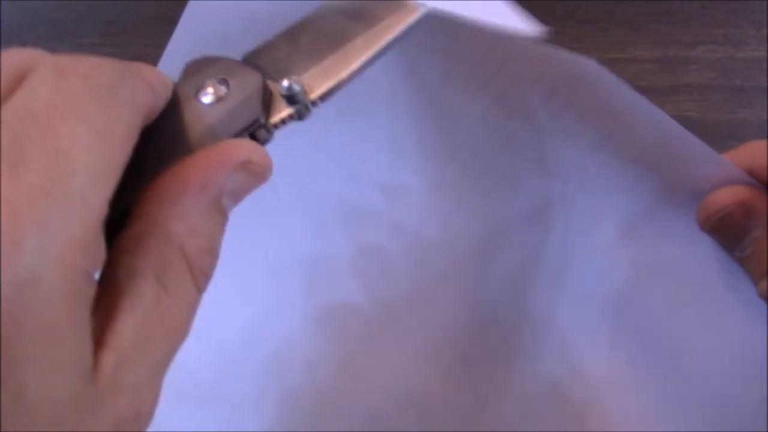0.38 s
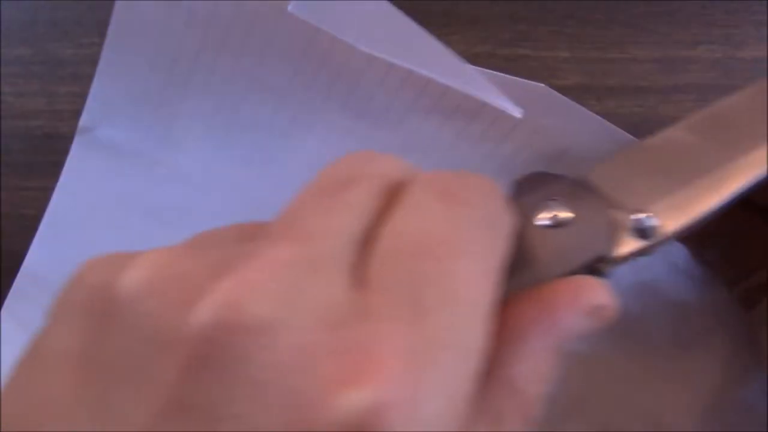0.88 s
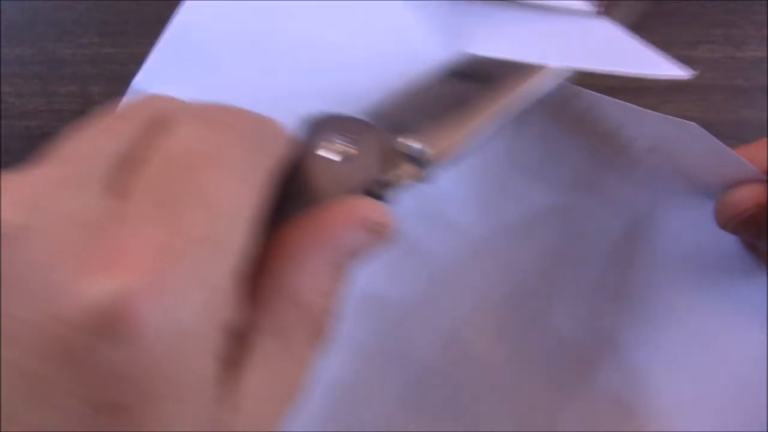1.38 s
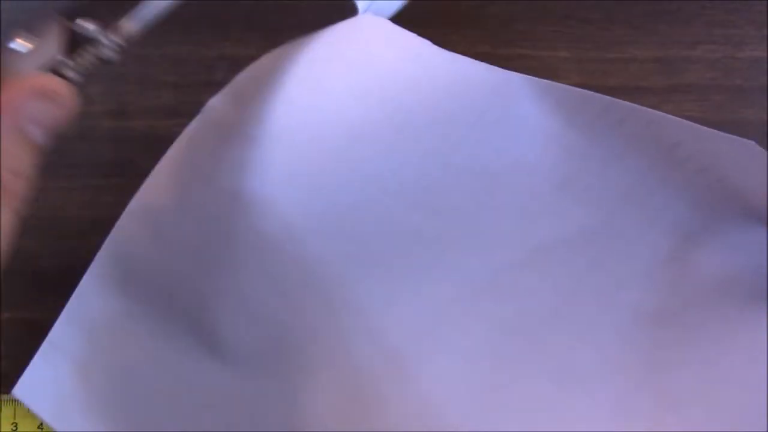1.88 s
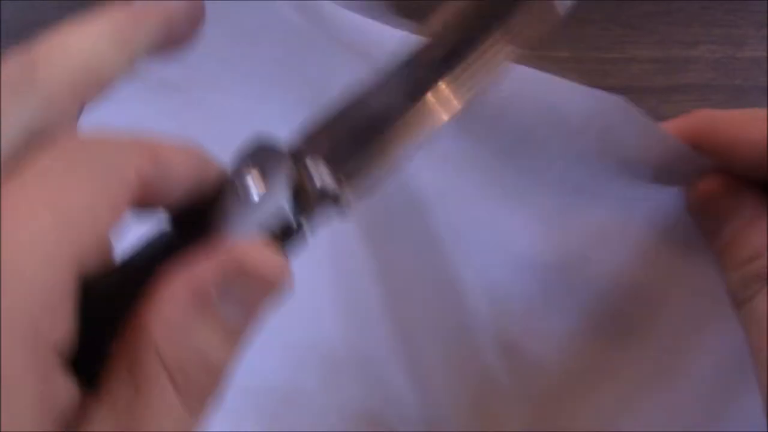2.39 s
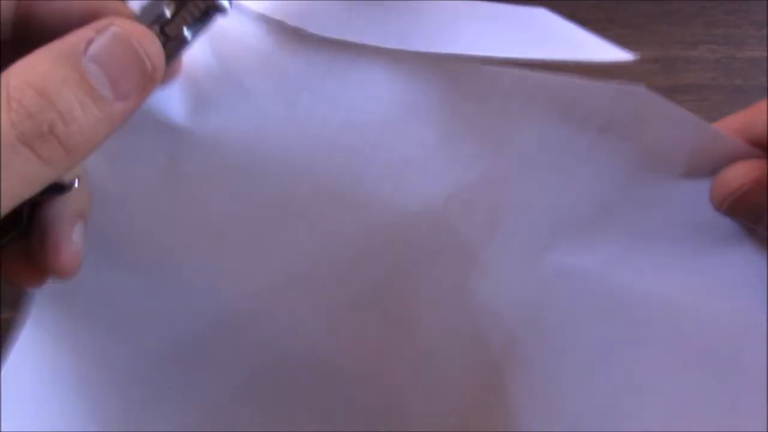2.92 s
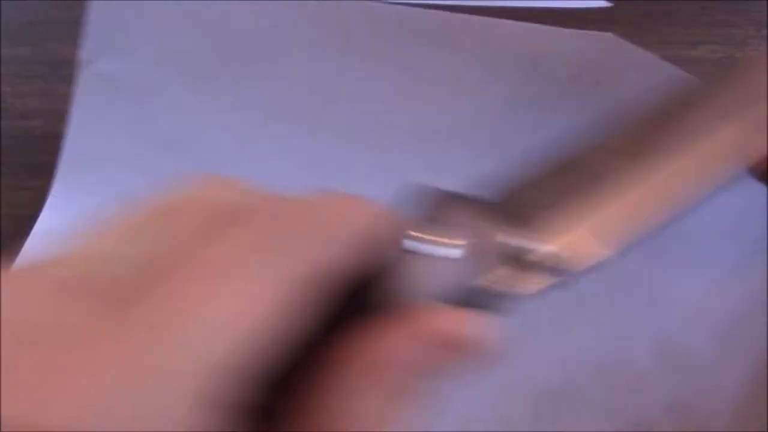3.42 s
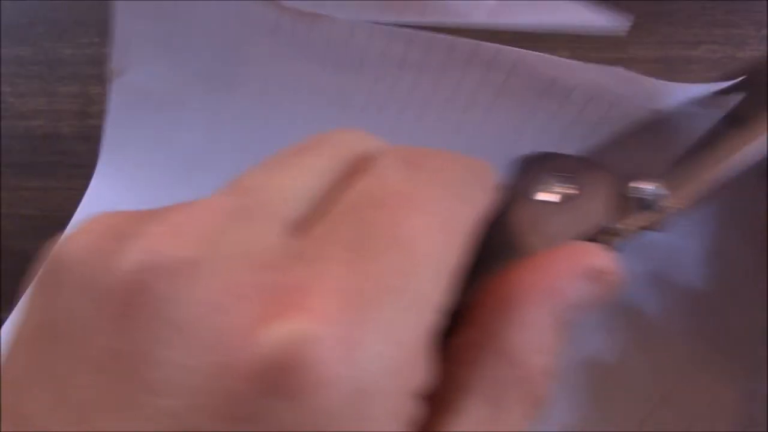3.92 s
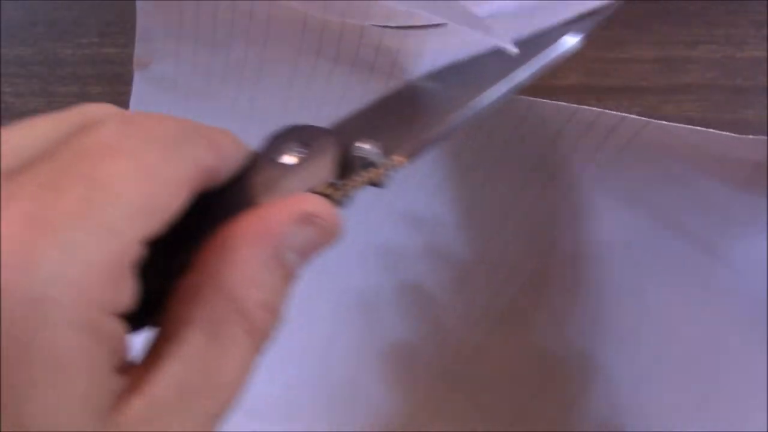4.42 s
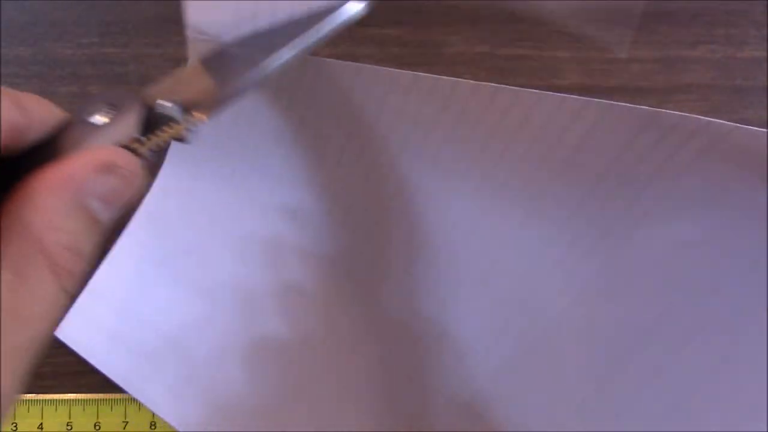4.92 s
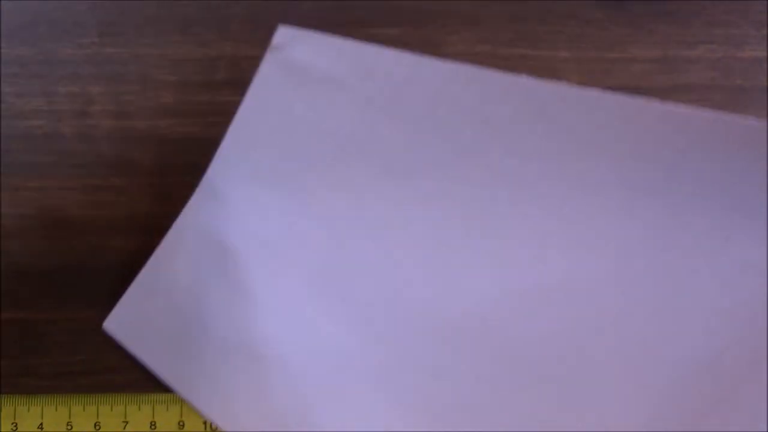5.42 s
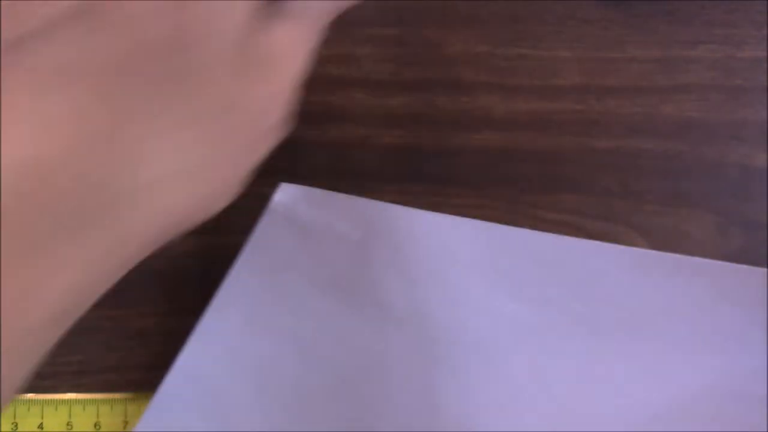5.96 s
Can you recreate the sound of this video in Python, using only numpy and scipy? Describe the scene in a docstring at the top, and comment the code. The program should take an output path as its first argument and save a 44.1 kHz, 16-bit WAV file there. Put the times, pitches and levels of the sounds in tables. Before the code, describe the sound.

Close, dry paper handling in a quiet room: creases snap, a keen knife rips through the sheet, busy crackling follows, then a second longer cut.

```python
"""A hand-held sheet of paper rustles and its creases snap; then a sharp knife slices it in two strokes, more handling
following each. Parting fibres are random impulses that drive the sheet's resonances, which shift as the strip curls away.
Rustle is coloured impulse noise and hiss with scuffed envelopes; each snap is a click with a dying crackle, ringing the sheet.
A small quiet room answers with a decaying noise tail, and faint steady air and microphone hiss lie beneath."""
import sys
import numpy as np
from scipy import signal
from scipy.fft import rfft, irfft, next_fast_len
from scipy.io import wavfile
from scipy.ndimage import uniform_filter1d, map_coordinates

SR = 44100
rng = np.random.default_rng(int(sys.argv[2]) if len(sys.argv) > 2 else 0)


def ratio(d):
    """dB to gain"""
    e = np.asarray(d, float) / 20
    return 10 ** e


def log_audio(samples):
    """Write samples as a 16-bit WAV file to the path given in sys.argv[1]."""
    # one column per channel
    frames = np.atleast_2d(samples).T
    # limit to full scale, then quantise
    limited = np.clip(frames, -1, 1)
    pcm = np.round(limited * 32767).astype(np.int16)
    wavfile.write(sys.argv[1], SR, pcm)


N = 267598  # samples

# One list per knife stroke, before a common trim: (t/s, blade pressure level/dB, slack of the strip/dB, brightness/dB,
# curl/dB, whistle/dB, edge resonance f/Hz, top resonance f/Hz)
BLADE_STROKES = [
    [(0.972, -51, 16.5, -10, 1.5, -12, 3450.0, 8000), (0.982, -32.5, 5, -8, -2.5, -12, 3330.0, 8050.0),
     (1.03, -21, -2, -2.5, 2.5, -0.6, 3240.0, 7900), (1.12, -16, 5, -3.5, 1, -3.5, 3380.0, 8700),
     (1.18, -14.5, -4, 1.5, 4, -0.5, 3510.0, 8370), (1.26, -15.5, -1, 6, 2.1, 1.5, 3330.0, 8780),
     (1.36, -12.5, -5, 4.5, -0.5, 3, 3010.0, 8330.0), (1.44, -11.5, -3, 2.2, -3.5, -10.5, 3090.0, 8090.0),
     (1.52, -12.5, 5.5, 0.7, -5.5, -11.5, 3250.0, 7100), (1.62, -11, 1, -0.5, 0.5, -6, 3270.0, 7900),
     (1.67, -19, 6, -2.5, -3.5, -6.8, 3520.0, 8390.0), (1.685, -10.5, -0.6, 6.5, 4, -11, 3600.0, 8140.0),
     (1.702, -18.5, 5, 6, 0, -7.5, 3680, 8210), (1.718, -15.5, 0.5, 4, 5.7, -6, 3600.0, 8230),
     (1.74, -28.5, 17, -3.8, 3, -0.5, 3650.0, 7570.0), (1.8, -31, 10, 0.5, 0, -3, 3440.0, 8060.0),
     (1.87, -50, 9, 7, 10.5, -5, 3520.0, 8390.0)],
    [(3.684, -54, 13, 1.5, -2.6, -4.5, 3090.0, 7850), (3.694, -26, 8.5, -7.5, -3.5, 1, 3000.0, 7730.0),
     (3.735, -31, 13, -1, -1, 3, 3180.0, 8010.0), (3.78, -24, -3, 5, 1.5, 2, 3450.0, 7730.0),
     (3.88, -14, -9.5, 0.5, 8, -1.5, 3550.0, 7560), (3.97, -13, -11, 0, 4.5, -3, 3720.0, 8230.0),
     (4.06, -15.5, -3, 1.5, -0.5, -11, 3540.0, 7990.0), (4.16, -17, -3.5, 1.2, -3.3, 0, 3560.0, 8580.0),
     (4.26, -14.5, 2.7, -6, -4, -2, 3440.0, 7700), (4.36, -13.5, -0.5, -0.5, 3.5, -6, 3520.0, 8020),
     (4.45, -12, 0, -5, 0.3, -4, 3240.0, 8460), (4.55, -14.1, 4.5, -2.5, -1.2, -4.5, 3060.0, 8450),
     (4.65, -11, 1.5, 1.1, 0.5, -7, 3170.0, 7540), (4.75, -12, 0.7, -1.5, -3, 5, 3230.0, 7450),
     (4.86, -13, 5, -2, -4, 2, 3620.0, 7810.0), (4.95, -11.5, 1, -3, 1, 0, 3660.0, 7800),
     (4.985, -41, 7, -1, -9, -12, 3640.0, 8300), (5.005, -42, 6.5, 12, -3.3, -9, 3350.0, 7840.0)],
]
# Resonances of the sheet: (f/Hz, width/Hz, level re blade pressure/dB); strokes move the centres of rows 4 to 6
SHEET_MODES = [(282, 74, -23), (726, 403, -9), (1258, 640, -5.5), (2184, 920, -7), (3440, 1310, -3.5),
               (6270, 3200, -9), (7930, 1800, -10.5), (10900, 6600, -10)]
# Response of each sheet resonance: (dB per dB of slack, of brightness, of curl, of whistle)
MODE_ANSWERS = [(1.23, 0.82, 0.2, -0.33), (0.64, -0.59, .25, 0.34), (-0.37, -0.39, -0.06, -0.55),
                (0.14, -.01, -0.9, 0.45), (-0.28, .5, -0.46, 0.19), (0.15, .45, -0.1, -0.27),
                (-0.16, 0.39, 0.3, 1.5), (0.2, 0.12, 1, -0.033)]
# Sheet flexing and sliding over fingers and blade, before the layer trims:
# (t/s, level/dB, hiss over flexing/dB, swell across the scuff/dB, scraping over level/dB)
SCUFFS = [(0.043, -31, -9, 20.5, -6.5), (0.087, -35.5, -0.5, -2.5, -7), (0.142, -34.5, 6, -1.8, -5.5),
          (0.241, -33.5, -1.5, -7.5, -5.5), (0.273, -37.5, -16, -25, -11.5), (0.307, -33, -21.5, 4, -13.5),
          (0.332, -40.4, -4, -4, -4), (0.368, -35.5, -4, -0.5, -5), (0.398, -40.5, -7.8, -5.6, -6.6),
          (0.421, -31.5, -17, -5.5, -13.5), (0.475, -47, -1, -4, -7), (0.526, -45.5, 6, -7.5, -5),
          (0.572, -57.5, 1, -14, -8), (0.658, -61, -12, -27, -14), (1.867, -47.5, 13, -3, -9),
          (1.905, -54.5, -6, -16, -11), (2.019, -35, -34.5, 8, -21), (2.039, -27, -37, -5, -14.9),
          (2.053, -28.5, -2.5, 0, -1), (2.101, -26.0, 6, 2.5, -1), (2.144, -29.5, -3.7, -26, 1),
          (2.172, -19.5, 0.3, -1.2, -1.5), (2.194, -23, 9, 11.5, -2.5), (2.231, -21.8, -6, -17, -3.5),
          (2.259, -33.2, -23, -1.3, -9), (2.272, -25.5, 3, -20.5, -2.5), (2.292, -30, -10, -6, -11.5),
          (2.349, -38.5, -2, 2, -4.6), (2.385, -43.4, -14, -10, -3), (2.424, -40.5, -4, 8, 0.5),
          (2.454, -33.5, -3, -4.5, 0), (2.491, -45, 0, 6.5, 2), (2.527, -32, -12, -9, -7),
          (2.58, -27.5, -12, -7.5, -10), (2.653, -32.5, -3.5, -3.5, -6.5), (2.707, -35, -3, -5, -5.5),
          (2.739, -30, 0.8, 1, -7), (2.791, -37.5, -2.5, 6, -3.5), (2.826, -30, -2.5, 6, -3.5),
          (2.847, -28, -4, -9, -9.5), (2.87, -38.5, -16.5, 5, -8.7), (2.896, -24.5, -15, -1.5, -12.5),
          (2.953, -31, -2.5, -3, -7), (3.008, -27, -12.5, 3, -11), (3.035, -39.5, -11.5, -2, -6),
          (3.056, -33.5, 1.3, -3.9, -1), (3.082, -34.5, -14, -4, -11), (3.102, -24, -37, -10, -20),
          (3.13, -31, -24, -9, -16), (3.186, -39.5, -10, -15, -7), (3.257, -51.5, 5, -9.5, 3),
          (3.305, -57, -12, -9.5, -5), (3.377, -52, -20, -17, -8.5), (5.007, -44, 4.5, -3, 0),
          (5.037, -38, 4.5, -20.5, -4), (5.091, -36, 3, -27.5, -2), (5.139, -44, 5, -0.5, -3),
          (5.16, -47, -4.5, 0.5, -3), (5.204, -48.5, 7, -4.8, -3.7), (5.255, -52, 9, 2, 0),
          (5.335, -53.5, -3, 9.5, 0), (5.415, -57.5, -10.7, 1, -7), (5.505, -49.9, -2, 6, -6),
          (5.548, -45, -8, 4.5, -4.5), (5.59, -58.5, -13.5, -19, -6), (5.764, -49.5, -4, 3, -9),
          (5.847, -59.5, -2, -1.5, 0), (5.94, -54.5, -5, 4, -4), (6.034, -43, 7, -2, -14)]
# Relative spectrum of the flexing sheet: (f/Hz, level/dB per Hz)
FLEX_SPECTRUM = [(60, -48.5), (130, -9.5), (200, -12.5), (330, -6), (470, -5.5), (650, -0.5), (800, -0.5),
                 (1400, -12), (2200, -45)]
# Relative spectrum of the scraping grains: (f/Hz, level/dB per Hz)
SCRAPE_SPECTRUM = [(500, -30), (1100, 2), (1400, 7), (2200, 1), (3100, 1.5), (4400, -8), (7000, -29)]
# Relative spectrum of the sliding hiss: (f/Hz, level/dB per Hz)
SLIDE_SPECTRUM = [(2650, -22.5), (4500, -10.5), (5390, -11), (8880, -11), (15000, -20), (16000, -21)]
# Creases that buckle, before the body and crack trims: (t/s, body peak level/dB, pitch f/Hz, crack peak level/dB)
CREASE_SNAPS = [(0.0313, -23.5, 2950, -18), (0.07, -17.6, 2060, -14), (0.078, -7, 1440, -21),
                (0.0816, -7, 1490, -14), (0.0908, -23, 1420, -29.7), (0.0983, -25, 1520, -33.3),
                (0.316, -31, 820, -57.5), (0.367, -27, 1660, -41.4), (0.432, -29, 1160, -45.1),
                (0.454, -29.8, 1040, -43.3), (0.501, -40, 2500, -42.0), (0.529, -35, 1760, -39.4),
                (0.574, -46, 3000, -46.0), (0.6583, -19.5, 1610, -26), (0.667, -27.5, 1500, -29),
                (0.8277, -36, 1210, -54.6), (0.9798, -32, 1486, -39.7), (1.678, -16, 1850, -11.5),
                (1.684, -14, 2330, -10), (1.693, -12, 3400, -8.2), (1.7138, -6, 2050, -6),
                (1.7325, -25.7, 1700, -23.2), (1.76, -19.5, 1100, -29.6), (1.7903, -11, 2670, -15),
                (1.9111, -34, 1470, -45), (2.0243, -47, 870, -58.7), (2.0547, -5.5, 1540, -12),
                (2.143, -22, 2230, -14), (2.1463, -9, 2520, 1.5), (2.149, -5.5, 2030, -15),
                (2.175, -11, 1800, -17.2), (2.2175, -22, 2540, -21.2), (2.2325, -5.5, 2830, -8),
                (2.2729, -20.1, 2110, -3.5), (2.275, -12.5, 2390, -16), (2.295, -15.5, 885, -33.5),
                (2.3101, -23.3, 930, -34.5), (2.3771, -30.5, 1380, -17), (2.386, -32.6, 1580, -36),
                (2.4528, -23.1, 2500, -36.5), (2.4773, -17.5, 3350, -30.1), (2.5314, -4.5, 2300, -11),
                (2.5857, -24, 900, -33.4), (2.66, -29, 970, -34.2), (2.745, -25, 1550, -30.5),
                (2.781, -18.5, 2950, -26.1), (2.8458, -10, 2350, -23.4), (2.8495, -8.5, 2410, -9.5),
                (2.9033, -20, 1180, -16.5), (2.9309, -18.5, 920, -35.1), (2.966, -21, 1220, -38.5),
                (3.057, -24, 2340, -36.3), (3.0894, -23, 2450, -45.1), (3.0985, -33, 910, -46.9),
                (3.1116, -10.5, 1720, -30), (3.1483, -24, 800, -54.1), (3.173, -24.5, 1160, -26),
                (3.263, -29.5, 2790, -48.5), (3.2877, -28.5, 3230, -46), (3.3504, -38.2, 3260, -56),
                (3.378, -46, 1050, -65.7), (3.69, -24.9, 1230, -40), (3.7166, -11, 1900, -27),
                (3.7577, -18.5, 1450, -25.8), (4.9599, -2.5, 2260, -3), (5.045, -22, 3140, -26.6),
                (5.0944, -10, 2420, -10), (5.1481, -34, 2460, -30), (5.209, -39.0, 2950, -35),
                (5.227, -32, 2690, -40.7), (5.288, -33, 2050, -45.2), (5.3476, -32.5, 2980, -45.8),
                (5.3628, -38.7, 3110, -51.3), (5.399, -32, 3240, -47), (5.518, -42.4, 2860, -34),
                (5.5298, -33, 1710, -47), (5.774, -48.5, 1230, -49), (5.8138, -51, 1200, -50.3),
                (5.8324, -42, 2840, -41.9)]
# Reverberation of the walls: (f/Hz, 60 dB decay time/s)
WALL_DECAY = [(200, 0.31), (2000, 0.16), (10000, 0.13)]
# Relative spectrum of the room tone: (f/Hz, level/dB per Hz)
ROOM_TONE_SPECTRUM = [(15, -46.5), (25, -50.5), (92, -2), (416, 3.5), (463, -0.5), (560, 1), (677, -0.5),
                      (9070, -23), (16000, -35)]
# Microphone response: (f/Hz, gain/dB)
MICROPHONE = [(25, -30.5), (90, -12.5), (170, 0.5), (9000, -2.5), (14000, -12.5), (16000, -19)]


def strokes():
    """Forced resonance: parting fibres drive modes whose strengths and centres follow the blade along the sheet."""
    parting = fibres(per_s=18000, spread_db=0.7, clump_db=0.68, clump_rate=110)
    f, t, z = signal.stft(parting, SR, nperseg=512, noverlap=384)
    pressure_db, *shape_db, edge_hz, top_hz = curves(BLADE_STROKES, t)
    strength_db = pressure_db + np.array(MODE_ANSWERS) @ shape_db
    centres = [np.full(len(t), hz) for hz, _, _ in SHEET_MODES]
    # the upper resonance lies just above the geometric mean of edge and top
    upper_hz = 1.155 * np.sqrt(edge_hz * top_hz)
    centres[4:7] = edge_hz, upper_hz, top_hz
    power = 0
    for (_, width, db), hz, level in zip(SHEET_MODES, centres, strength_db):
        band = abs(resonance(f[:, None], hz, width)) ** 3.55
        power = power + ratio(2 * (level + db)) * SR / width * band
    cutting = sum((t > rows[0][0]) & (t < rows[-1][0]) for rows in BLADE_STROKES)
    cut = signal.istft(z * np.sqrt(power) * cutting, SR, nperseg=512, noverlap=384)[1][:N]
    return ratio(-3.0) * streaked(cut, streak_db=2.48, patch_db=1.5)


def fibres(per_s, spread_db, clump_db, clump_rate):
    """Shot noise: tiny breaks of random sign at random moments, of uneven size, with clumped strength."""
    breaks = (rng.random(N) < per_s / SR) * rng.standard_normal(N)
    size_db = spread_db * rng.exponential(1, N) + clump_db * wobble(clump_rate)
    return unit(breaks * ratio(size_db))


def resonance(f, hz, width_hz):
    """Damped harmonic oscillation: a causal band response with gain 1 at its centre."""
    return 1j * f * width_hz / (hz * hz - f * f + 1j * f * width_hz)


def rustle():
    """Friction and bending: flexing, scraping and sliding set in at once, swell or fade, and share the hand's jerks."""
    envelopes = scuff_envelopes()
    jerk = wobble(70)
    bends = fibres(per_s=2500, spread_db=0.0, clump_db=2.5, clump_rate=31)
    grains = fibres(per_s=10000, spread_db=2.5, clump_db=-0.4, clump_rate=340)
    hiss = grains + 0.6 * rng.standard_normal(N)
    flex = envelopes[0] * ratio(0.89 * jerk) * coloured(bends, FLEX_SPECTRUM)
    scrape = envelopes[1] * ratio(0.83 * jerk) * coloured(grains, SCRAPE_SPECTRUM)
    slide = envelopes[2] * ratio(2.4 * jerk) * coloured(hiss, SLIDE_SPECTRUM)
    return streaked(flex + scrape + slide, streak_db=1.5, patch_db=1.05)


def scuff_envelopes():
    """Energy division: flexing and hiss share each scuff's power; scraping has its own level; all decay exponentially."""
    longest_s, flex_trim_db, slide_trim_db = 0.11, -3.5, -2.5
    shape = np.zeros((3, N + SR))
    ends = [row[0] for row in SCUFFS[1:]] + [N / SR]
    for (s, db, hiss_db, swell_db, scrape_db), end in zip(SCUFFS, ends):
        # a scuff lasts until the next one, or the longest duration
        length = max(round(min(end - s, longest_s) * SR), 9)
        u = np.linspace(-.5, .5, length)
        flex_db = db - 10 * np.log10(1 + ratio(2 * hiss_db))
        layer_db = np.array([flex_db + flex_trim_db, db + scrape_db, flex_db + hiss_db + slide_trim_db])
        start = round(s * SR)
        shape[:, start:start + length] += ratio(layer_db[:, None] + swell_db * u)
    fade = np.exp(-np.arange(SR // 20) / (0.0022 * SR))  # time constant 2.2 ms
    return signal.fftconvolve(shape, fade[None] / fade.sum(), axes=1)[:, :N]


def snaps():
    """Impulse excitation: each buckling crease is a click with a dying crackle that rings the sheet's modes.

    Body modes near its pitch ring most, the treble cracks, and the low body lasts longest."""
    s, peak_db, pitch_hz, crack_db = np.transpose(CREASE_SNAPS)
    off_pitch_db_per_octave = 9
    body_db = []
    for k in (2, 1, 4):
        octaves = abs(np.log2(pitch_hz / SHEET_MODES[k][0]))
        body_db.append(peak_db + 3.5 - off_pitch_db_per_octave * octaves)
    levels_db = [*body_db, crack_db - 1.0]
    groups = [SHEET_MODES[2:3], SHEET_MODES[1:2], SHEET_MODES[3:5], SHEET_MODES[5:7]]
    crackle_t60_s = [0.0403, 0.0416, 0.01794, 0.00832]

    t, f = np.arange(4096) / SR, np.fft.rfftfreq(8192, 1 / SR)
    chance = rng.standard_normal((len(s), 2, len(t)))
    crackle = chance[:, 0] * (chance[:, 1] > .7)  # sparse impulses
    places = np.round(s * SR).astype(int)[:, None] + np.arange(len(t))
    out = np.zeros(N + len(t))
    for modes, db, t60 in zip(groups, levels_db, crackle_t60_s):
        drive = crackle * ratio(-60 * t / t60)
        drive[:, 0] = 5.6  # the click
        # neighbouring modes ring in opposite sign, each band widened and used twice
        ring = sum((-1) ** k * resonance(f, hz, 1.6 * width) ** 2 for k, (hz, width, _) in enumerate(modes))
        burst = irfft(rfft(drive, 8192) * ring)[:, :len(t)]
        burst *= (ratio(db) / abs(burst).max(1))[:, None]
        out += np.bincount(places.ravel(), burst.ravel(), len(out))[:len(out)]
    return out[:N]


def streaked(x, streak_db, patch_db):
    """Uneven radiation: the bending sheet gives narrow streaks of gain and patches that drift upward as it curls."""
    z = signal.stft(x, nperseg=512, noverlap=384)[2]
    streaks = blurred_noise(z.shape, bins=3, frames=36)
    patches = blurred_noise(z.shape, bins=8, frames=30)
    row, column = np.indices(z.shape)
    rising = patches[(row - column // 7) % len(z), column]  # one bin up every 7 frames
    treble = np.clip(row / 70, .15, 1)  # short waves scatter most
    gain_db = streak_db * streaks + patch_db * treble * rising
    return signal.istft(z * ratio(gain_db), nperseg=512, noverlap=384)[1][:N]


def blurred_noise(shape, bins, frames):
    """Correlated randomness: noise averaged over neighbouring frequencies and times, rms 1."""
    noise = uniform_filter1d(rng.standard_normal(shape), size=bins, axis=0)
    return unit(uniform_filter1d(noise, size=frames, axis=1))


def room(x):
    """Reverberation: the walls answer with diffuse noise, each frequency dying at its own speed."""
    hz, t, z = signal.stft(rng.standard_normal(SR // 3), SR, nperseg=256)
    decay = ratio(-60 * t / along(WALL_DECAY, hz)[:, None])
    tail = signal.istft(z * decay, SR, nperseg=256)[1]
    delayed = np.pad(x, (200, 0))  # samples
    return signal.fftconvolve(delayed, tail / np.linalg.norm(tail))[:N]


def room_tone():
    """Stationary noise: faint steady air and microphone hiss."""
    return ratio(-53.5) * coloured(rng.standard_normal(N), ROOM_TONE_SPECTRUM)


def coloured(x, spectrum):
    """Spectral shaping: x weighted by a table of level against frequency, rms 1."""
    return unit(filtered(x, lambda hz: ratio(along(spectrum, hz))))


def filtered(x, response):
    """Linear filtering: the spectrum of x times a complex response of frequency."""
    m = next_fast_len(N + SR // 2)
    return irfft(rfft(x, m) * response(np.fft.rfftfreq(m, 1 / SR)), m)[..., :N]


def wobble(rate):
    """Slow modulation: a smooth random curve through `rate` knots a second."""
    knots = rng.standard_normal(int(N * rate / SR) + 4)
    return map_coordinates(knots, [np.arange(N) * rate / SR])


def curves(tables, t):
    """Linear interpolation in time: each column after the first, read at times t."""
    s, *cols = np.transpose(np.concatenate(tables))
    return np.array([np.interp(t, s, c) for c in cols])


def along(points, hz):
    """Interpolation on a logarithmic frequency axis through (f/Hz, value) points."""
    f, v = np.transpose(points)
    return np.interp(np.log(hz + 1), np.log(f + 1), v)


def unit(x):
    """Normalisation of mean power: x scaled to rms 1."""
    return x / np.sqrt(np.mean(x ** 2) + 1e-20)


def scene():
    """Superposition: the paper, its creases and their echoes reach the microphone, and the room tone is added."""
    creases = snaps()
    paper = strokes() + rustle()
    echo = ratio(-18) * room(paper) + ratio(-12.5) * room(creases)
    near = paper + creases + echo
    heard = filtered(near, lambda hz: ratio(along(MICROPHONE, hz)))
    return (heard + room_tone())[None]


def band_limit(x):
    """A steep low-pass at the top of the band."""
    return signal.sosfilt(signal.butter(12, 16510, fs=SR, output="sos"), x)


def record(dry):
    """Saturation and band limiting: loud peaks are rounded softly, deep bass is cut and the extreme treble removed."""
    bass_cut_hz, top_hz = 35, 16000
    soft = dry / (1 + abs(dry / .9) ** 6) ** (1 / 6)
    mix = filtered(soft, lambda hz: (hz < top_hz) * hz ** 2 / (hz ** 2 + bass_cut_hz ** 2))
    return band_limit(mix)


dry = scene()
out = record(dry)
log_audio(out)
```